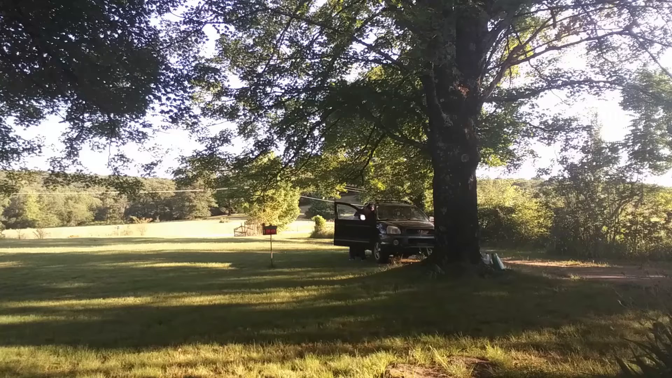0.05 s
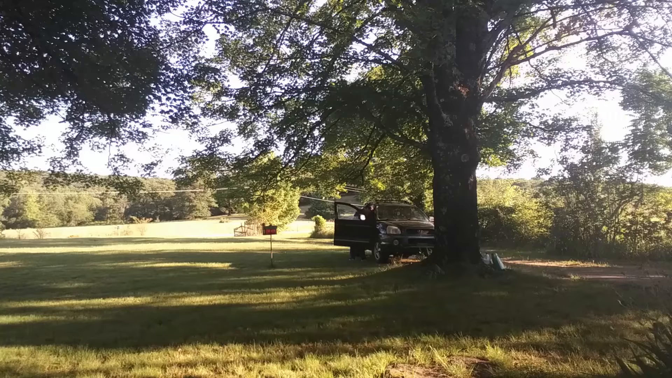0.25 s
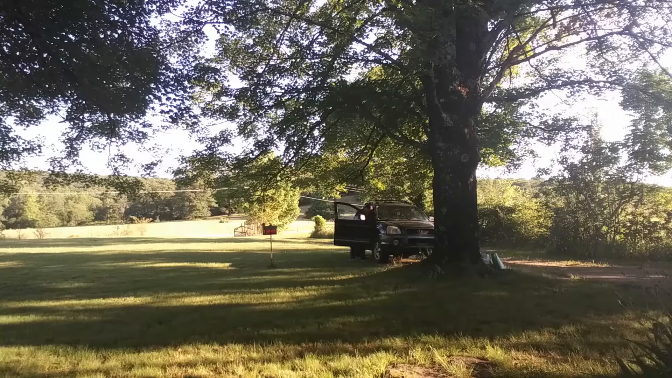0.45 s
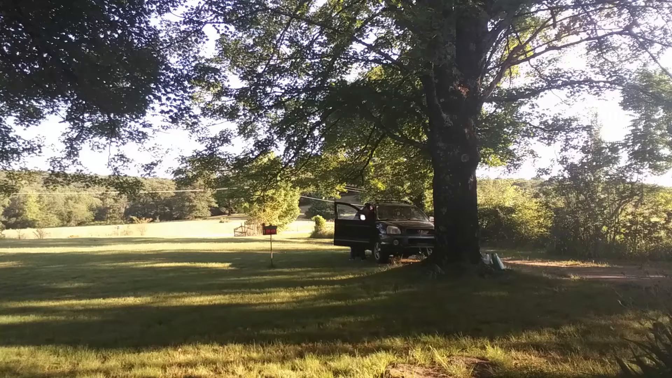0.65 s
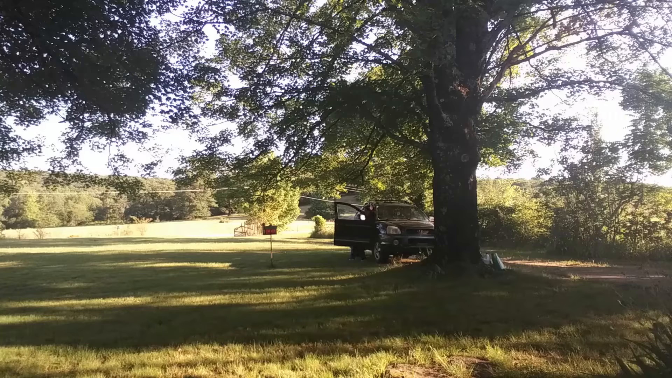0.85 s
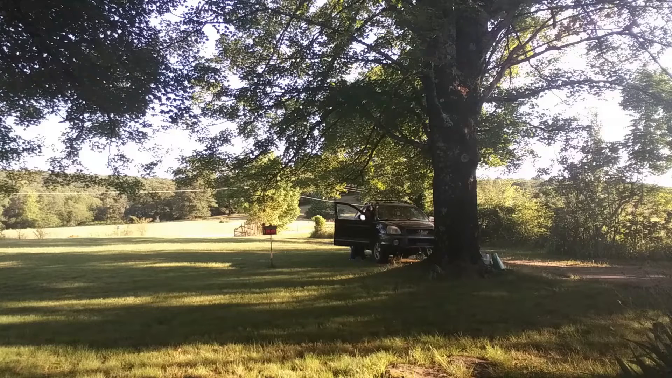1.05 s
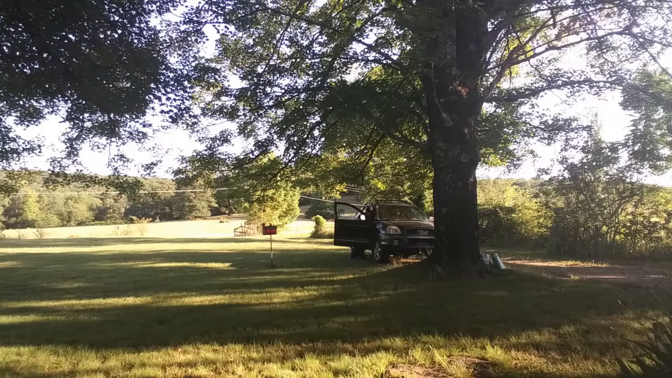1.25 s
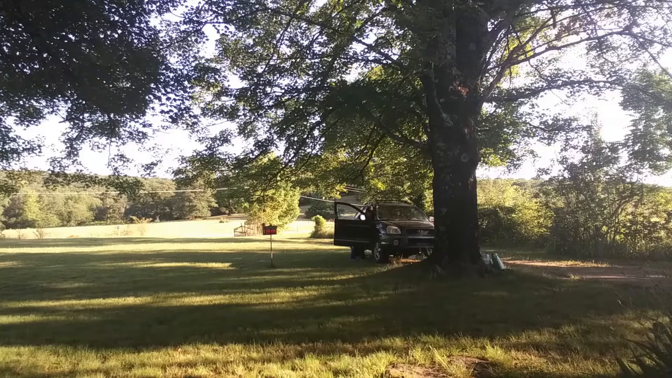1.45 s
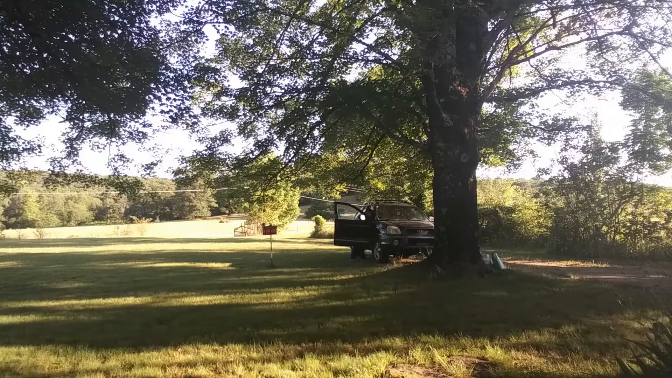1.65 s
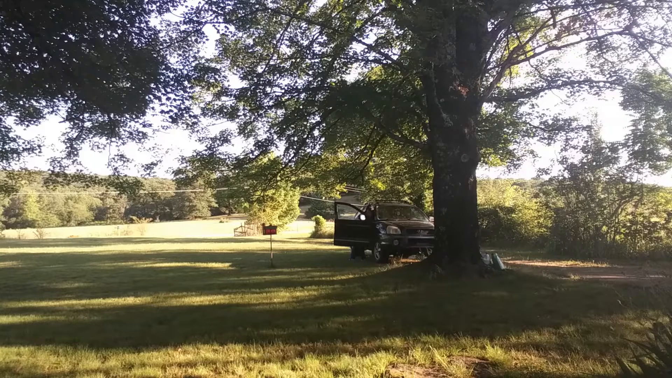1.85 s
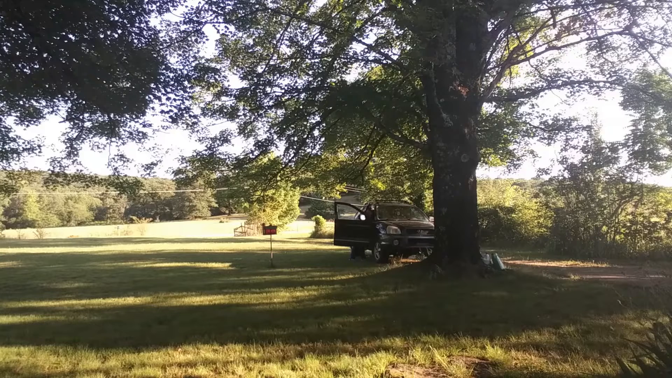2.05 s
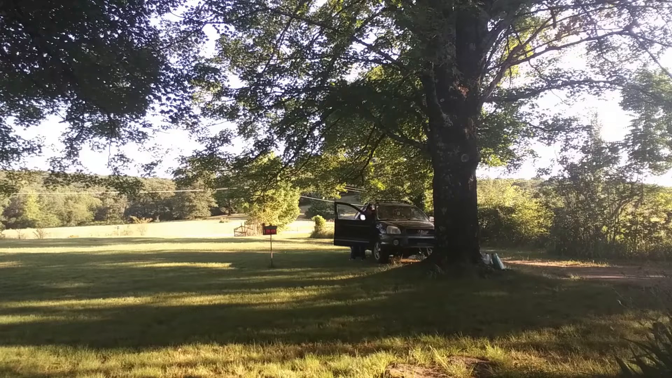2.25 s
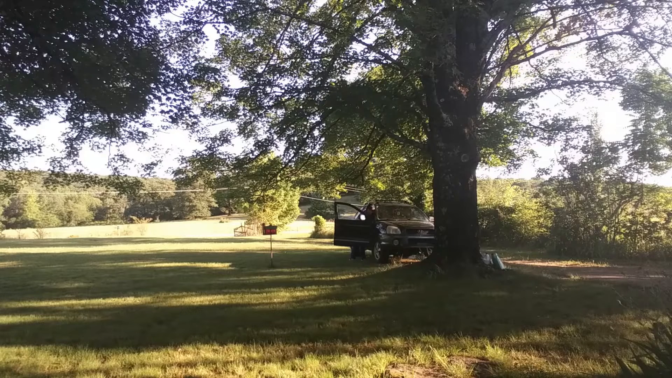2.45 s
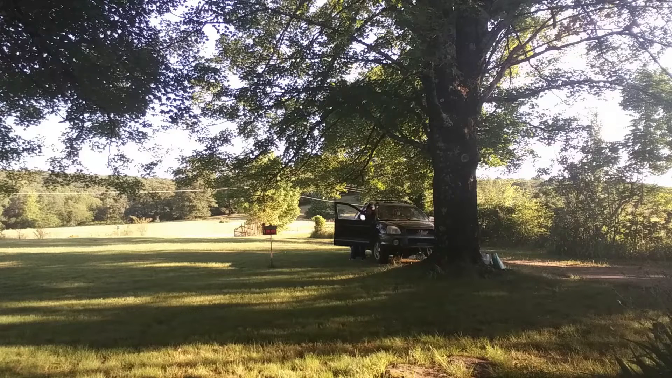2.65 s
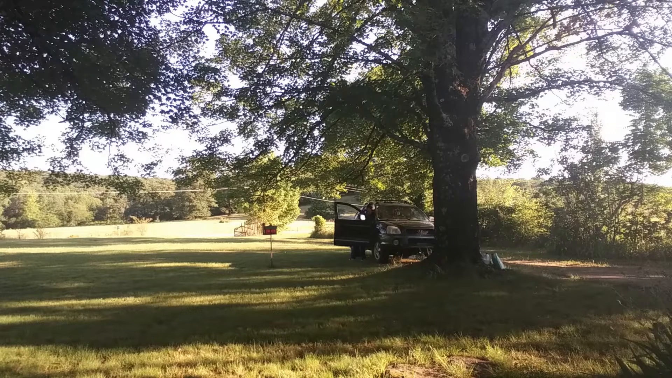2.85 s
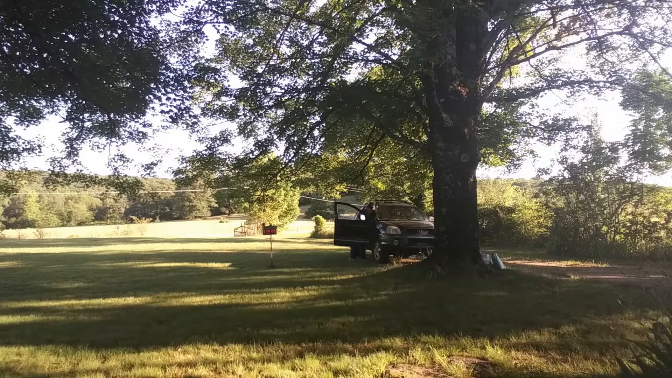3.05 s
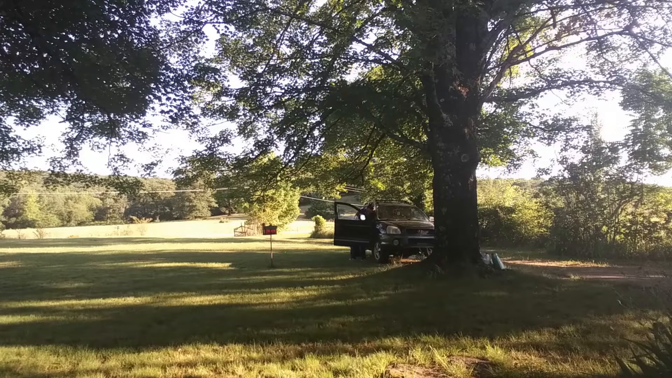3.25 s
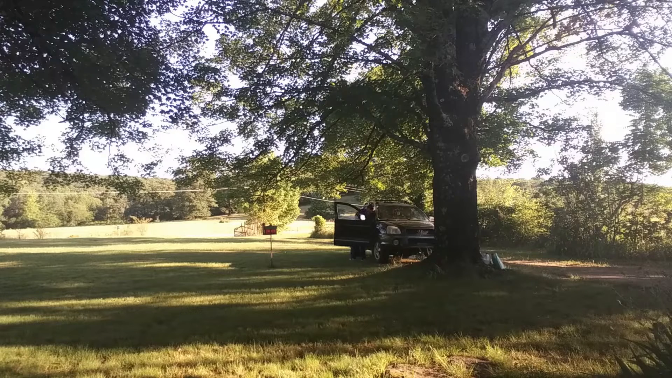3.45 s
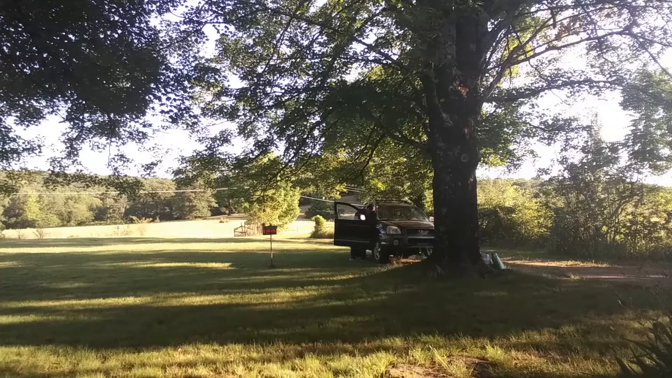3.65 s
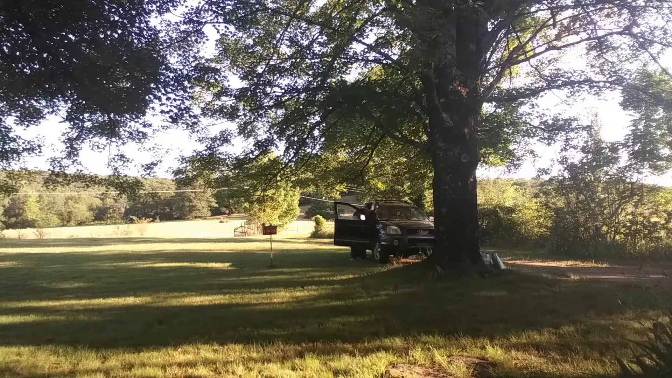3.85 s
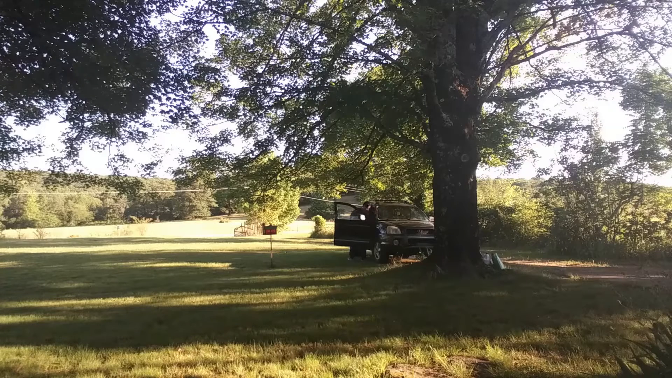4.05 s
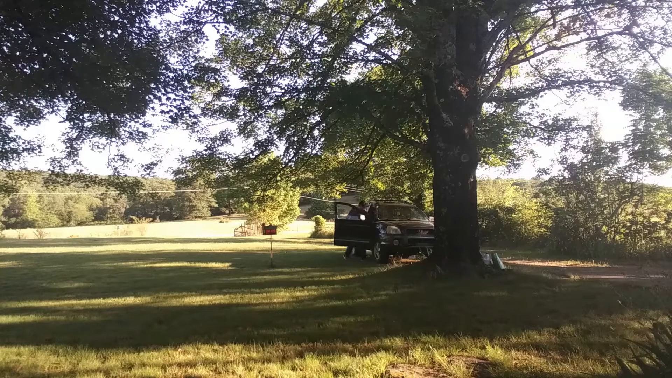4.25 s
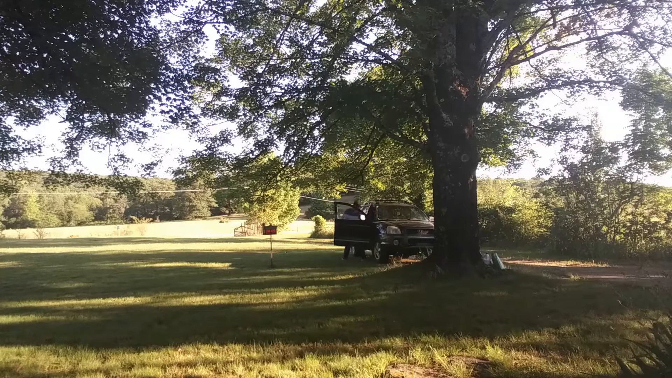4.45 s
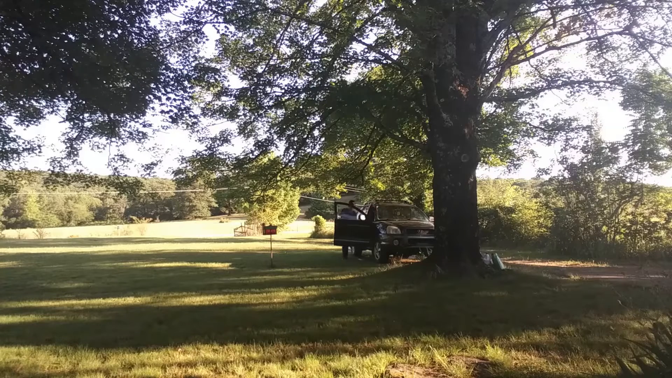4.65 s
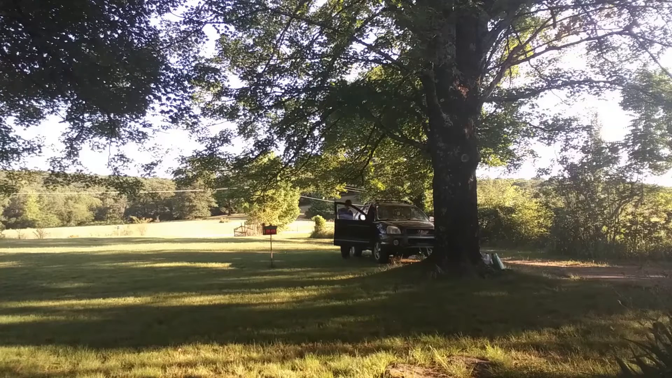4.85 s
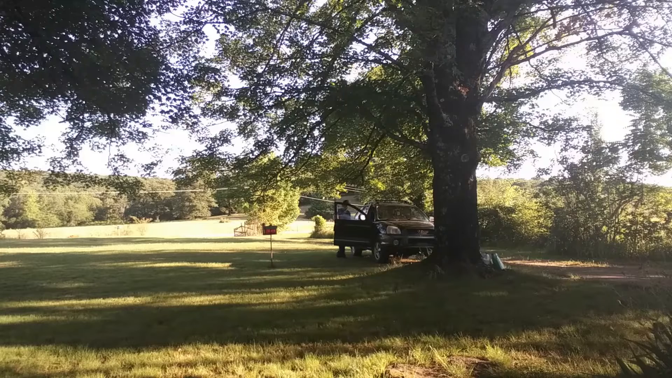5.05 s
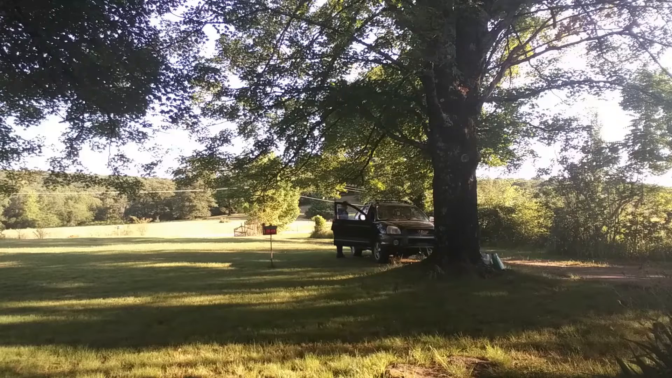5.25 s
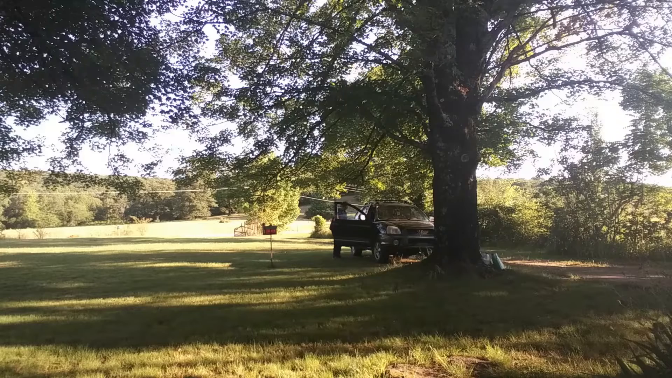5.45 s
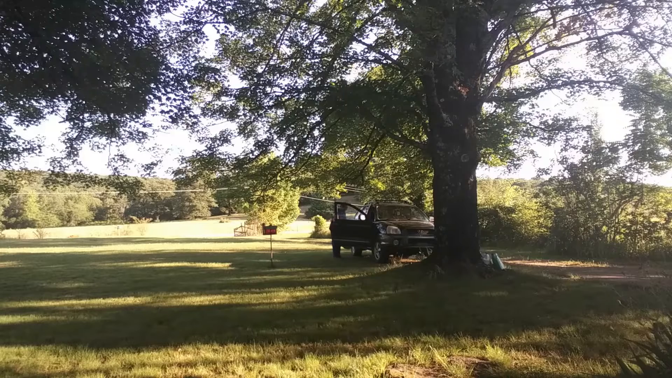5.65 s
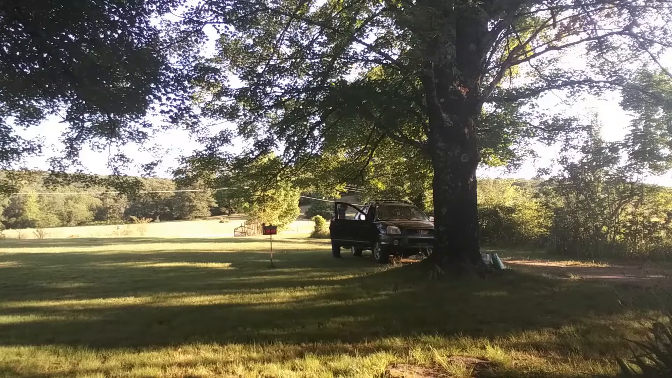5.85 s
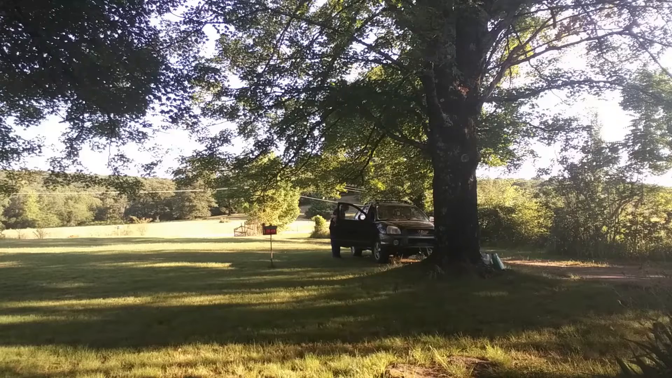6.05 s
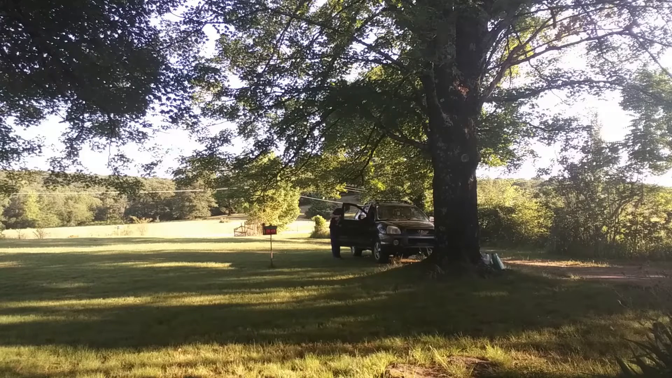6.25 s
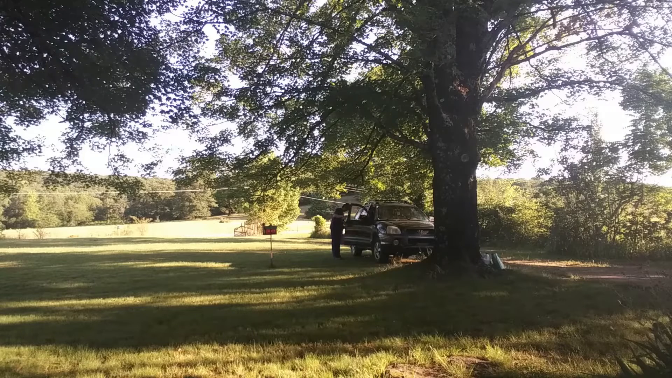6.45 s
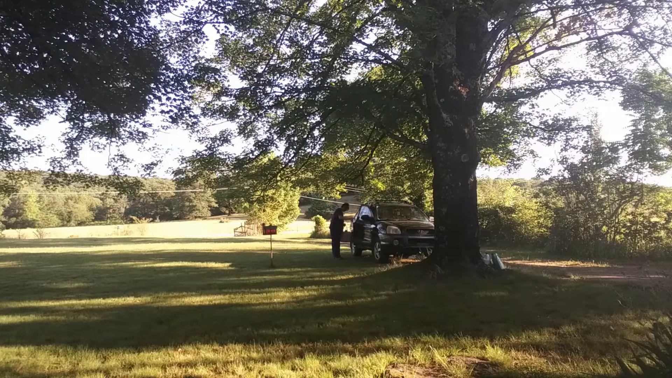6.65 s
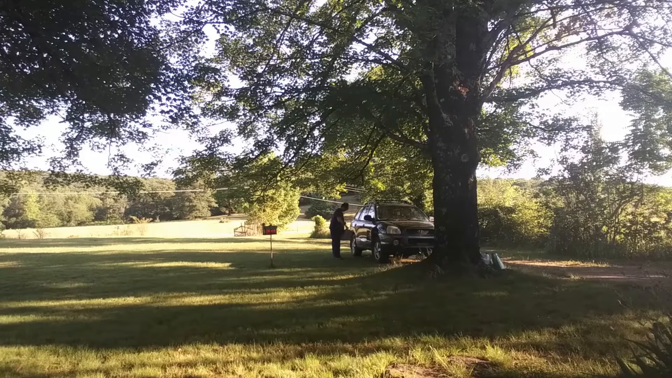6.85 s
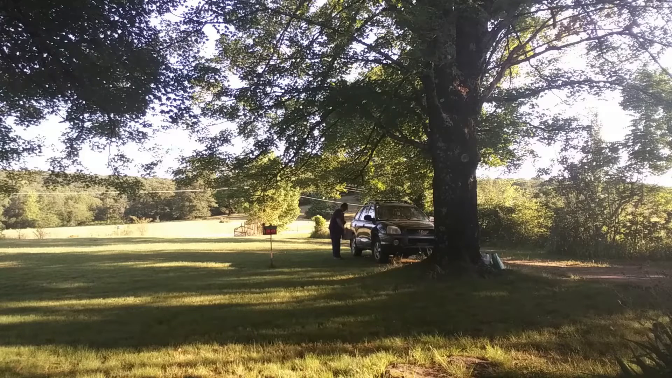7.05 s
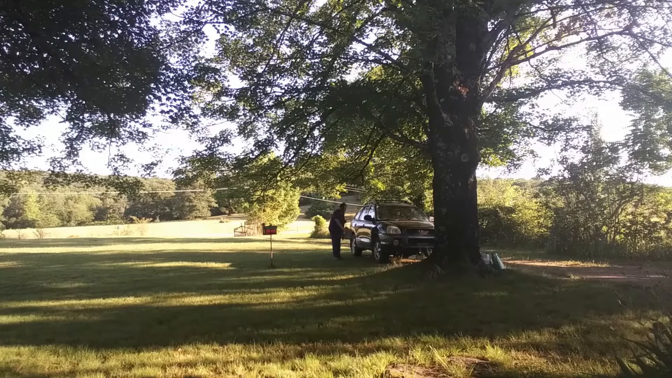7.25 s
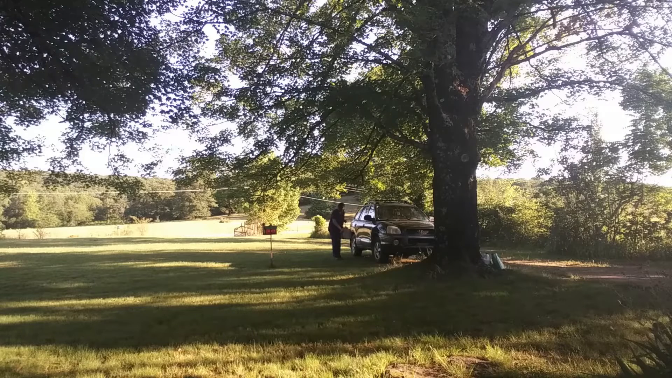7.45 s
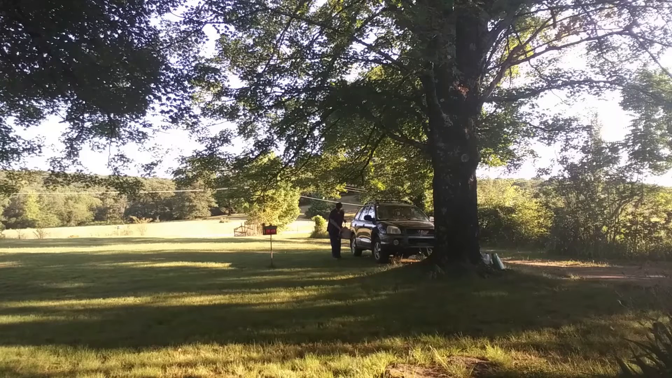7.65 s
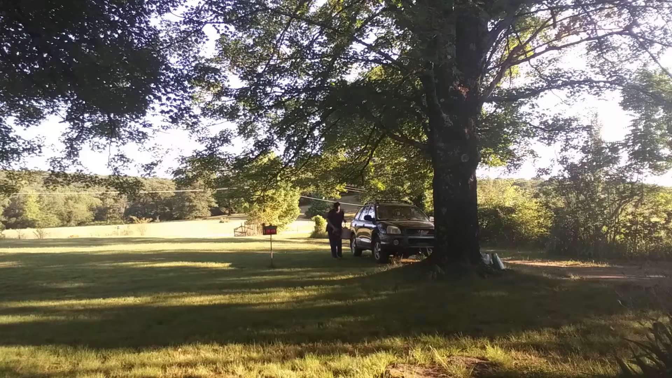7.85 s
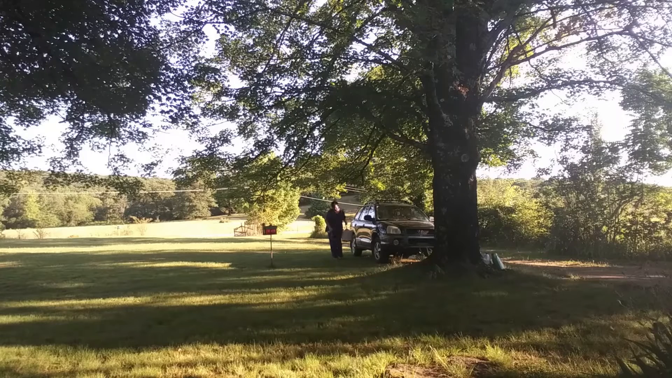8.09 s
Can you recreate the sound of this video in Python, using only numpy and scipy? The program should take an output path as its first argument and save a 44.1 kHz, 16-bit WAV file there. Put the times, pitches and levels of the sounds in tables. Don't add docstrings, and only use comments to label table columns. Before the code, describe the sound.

Outdoors in a calm yard, birds whistle and chirp in falling notes over thin insect shimmer and a low distant motor wash. The car, some way off, makes tiny clicks and dull thuds, then a brief stuttering shift. One sudden door slam dominates everything: latch, seal and frame strike nearly together, the body booms and trim rattles. Its short tree echo fades, leaving light knocks and birds in a plain mono pickup.

```python
import sys
import numpy as np
from scipy import signal
from scipy.fft import rfft, irfft, next_fast_len
from scipy.io import wavfile
from scipy.ndimage import uniform_filter1d

SR = 44100
rng = np.random.default_rng(int(sys.argv[2]) if len(sys.argv) > 2 else 0)


def bounce(signal):
    frames = np.transpose(np.atleast_2d(signal))
    limited = np.clip(frames, -1, 1)
    pcm = np.round(limited * 32767).astype(np.int16)
    wavfile.write(sys.argv[1], SR, pcm)


def field_ratio(decibels):
    return 10 ** (np.asarray(decibels, dtype=float) / 20)


N = 358091

# freq_hz, density_db_per_hz
WASH_SPECTRUM = [(12, -56), (20, -26), (38, -8), (60, -2.5), (119, 1), (179, -3), (317, -5.5), (340, -5.5),
                 (457, -7.5), (659, -9.5), (887, -8), (1530, -14), (3910, -19), (4700, -35.5), (6110, -58),
                 (10300, -120)]
WASH_DB = -66.5
# freq_hz, density_db_per_hz
HISS_SPECTRUM = [(300, -125), (3000, -119), (7000, -117), (10000, -117), (15700, -115)]
HISS_TOP_HZ = 15720
# centre_hz, width_hz, level_db
CRICKETS = [
    (5760, 104, -82),
    (5940, 530, -80.5),
    (5550, 320, -85),
]
# start_s, end_s, centre_hz, width_hz, level_db
DRONES = [
    (-1, 9, 129, 12, -83),
    (2.5, 4.1, 205, 4.2, -82),
    (2.5, 5.57, 880, 36, -83),
    (5, 5.6, 207, 15, -78),
    (12, 7.65, 550, 190, -73),
]
# start_s, end_s, pitch_hz, level_db
HUM = (5.95, 7.05, 312, -77)
# centre_hz, width_hz, level_db, chirps_per_s, wing_strokes_per_s
KATYDID = (9200, 220, -84, 5.7, 107)
# end_s, length_s, level_db
WHISTLES = [
    (0.118, .3, -81),
    (0.531, .13, -75),
    (0.96, 0.142, -78),
    (1.32, .14, -73.5),
]
WHISTLE_HZ, ONSET_SHARP_HZ, ONSET_S = 2165, 35, .04
SWELL_DB, STOP_S, ECHO_DB, ECHO_DB_PER_S = -8, .03, -11, -14
# start_s, top_hz, bottom_hz, level_db
CHIPS = [(.152, 5000, 2650, -65.5), (.268, 4430, 2450, -70), (.405, 3430, 2350, -73),
         (.788, 3210, 2950, -77), (1.644, 3800, 3170, -75), (1.83, 3100, 2670, -75),
         (1.963, 4020, 3130, -79), (2.25, 4500, 3150, -77), (2.37, 4600, 3700, -80),
         (2.495, 4850, 3800, -80), (3.038, 4500, 2750, -72.5), (3.3, 4900, 2740, -77),
         (3.075, 4900, 2930, -80), (4.195, 4700, 2460, -72), (4.318, 3980, 3060, -76),
         (5.174, 3850, 3050, -72), (5.333, 4450, 2680, -76), (5.468, 4300, 2530, -71.5),
         (6.288, 4230, 3530, -71), (6.378, 4060, 3350, -77), (6.555, 4280, 2600, -72),
         (7.494, 3330, 2900, -72), (7.631, 4850, 2290, -71.5), (7.748, 4300, 3100, -78),
         (7.882, 3430, 2480, -76.5)]
CHIP_MIN_S, CHIP_HZ_PER_S, CHIP_BEND = .022, 90000, 1.25
# start_s, length_s, pitch_hz, level_db
PEEPS = [(.5, .05, 2630, -72), (.974, 0.027, 3060, -81), (1.104, 0.042, 3130, -83), (1.31, .05, 2580, -76),
         (2.56, .05, 3750, -84), (2.58, .057, 2960, -74), (2.6, .037, 2110, -74), (2.892, 0.051, 1780, -73),
         (6.262, .057, 4270, -72), (6.57, .111, 4285, -82.5), (6.69, .101, 4250, -81),
         (6.4, .04, 4380, -82)]
# start_s, start_hz, level_db
RISES = [
    (3.045, 4150, -81),
    (3.272, 4080, -76),
    (6.218, 3270, -72.5),
    (6.35, 3450, -73.5),
]
RISE_S, RISE_SPAN_HZ, RISE_BEND = .046, 920, .6
# start_s, level_db
SLURS = [
    (3.489, -74),
    (3.735, -75),
]
SLUR_S, SLUR_HZ, SLUR_END_HZ, SLUR_BEND = .108, 4050, 3200, 2.4
# start_s, thud_db, click_db, click_hz
KNOCKS = [(1.385, -62, -53.5, 2030), (4.812, -58, -70, 1210), (4.918, -53, -57, 1260),
          (4.953, -59, -62, 1200), (5.068, -57, -57, 1520), (5.35, -52, -71, 1500), (5.4, -59, -62, 1500),
          (5.5, -70, -60, 1460), (7.389, -61, -54, 1950), (7.469, -58, -67, 1510), (7.496, -60, -57, 1725),
          (7.513, -64, -59, 1920), (7.658, -76, -58.5, 1540), (7.703, -67, -57, 1500),
          (7.7162, -52, -49, 1480), (7.728, -65, -52, 1530), (7.7393, -52, -45.5, 1580),
          (7.76, -57, -57, 1550), (7.791, -60, -61, 1500)]
KNOCK_THUD_HZ = 314
# start_s, thud_db, click_db
JUDDER = [
    (5.668, -58, -78),
    (5.778, -58, -53),
    (5.787, -59, -53.5),
    (5.797, -64, -55.5),
    (5.808, -53.5, -59),
]
JUDDER_THUD_HZ, JUDDER_CLICK_HZ = 400, 1620
# start_s, rattle_db, crack_db
STRIKES = [(6.9744, -36, -54), (6.9875, -26.5, -30.5), (6.996, -30, -46), (7.004, -33.5, -43),
           (7.015, -35, -40), (7.024, -34, -52), (7.037, -35.5, -50), (7.054, -43, -52), (7.067, -40, -56),
           (7.089, -46.5, -60), (7.106, -48, -63), (7.135, -54.5, -70), (7.176, -69, -79)]
# start_s, pitch_hz, level_db
THUMPS = [(6.975, 445, -29.5), (6.9904, 144, -18), (6.9895, 436, -15.5), (6.996, 298, -17),
          (6.991, 550, -27), (7.001, 118, -25), (7.0134, 408, -12.5), (7.019, 116, -19),
          (7.019, 297, -11.5), (7.032, 167, -28), (7.045, 322, -25), (7.0568, 134, -26), (7.0677, 400, -23),
          (7.069, 296, -25.5), (7.079, 112, -30), (7.087, 247, -37), (7.106, 368, -33.5),
          (7.117, 98, -36.5), (7.145, 392, -45), (7.205, 125, -55)]
THUMP_CYCLES = 13.1
# start_s, pitch_hz, level_db
LATCH = [
    (6.987, 1000, -25.5),
    (6.988, 4420, -26),
    (6.995, 2400, -25),
    (7.003, 1790, -33),
]
LATCH_T60_S = 0.022
# start_s, pitch_hz, level_db, t60_s
CABIN = [
    (7.0, 60.5, -28.5, 0.39),
    (7.151, 70, -41, .08),
    (7.028, 213.5, -25.5, 0.26),
    (7.014, 525, -36, 0.27),
    (7.069, 1265, -40, .13),
]
# pitch_hz, level_db
GLASS = [
    (1620, -58),
    (2050, -64),
    (3540, -64),
]
GLASS_START_S, GLASS_T60_S = 7.166, .22
# pitch_hz, level_db, t60_s
PANELS = [(660, 15, 0.069), (974, -5, 0.21), (1037, -2, 0.25), (1212, 10.5, 0.37), (1290, -26, 5.1),
          (1480, 0, 0.23), (1480, 1, 0.18), (1590, 8, 0.3), (1760, 8, 0.31), (1980, -23, 0.25),
          (2035, -23, 2.0), (2130, 2, 0.37), (2510, 3, 0.19), (2500, -15, 0.15), (2280, -1, 0.5),
          (2610, 5, 0.18), (2670, -3, 0.46), (2960, 5.5, 0.24), (3130, -15, 0.58), (3596, -1, 0.67),
          (3450, -1, 0.37), (4120, -5, 0.2), (4250, -17, 0.61), (4020, 2, 0.2)]
# freq_hz, density_db_per_hz
RATTLE_SPECTRUM = [(350, -50), (600, -8), (736, 2), (1030, -5.5), (1240, -5), (1370, -1), (2100, -3.5),
                   (2270, -7), (3540, -9.5), (5000, -52), (6500, -50), (11000, -120)]
# freq_hz, density_db_per_hz
CRACK_SPECTRUM = [(2060, -19), (3500, 3.5), (4840, -2.5), (5030, -8), (6660, -1.5), (7460, -10),
                  (9110, -16.5), (12500, -30), (15600, -38)]
# freq_hz, t60_s
TREES = [(100, 0.3), (250, 0.5), (450, 0.75), (1500, 1), (3500, 0.83), (8000, 1)]
GRASS_DIP_HZ = 630
# centre_s, loss_db, above_hz
DROPOUTS = [(.0743, -15, 2300), (.2234, -13, 1600), (1.097, -11, 1500), (1.548, -10, 1600),
            (1.82, -13, 1900), (1.8875, -6, 1500), (4.0417, -13, 2100), (5.066, -12, 1200),
            (5.32, -12, 1100), (5.443, -3, 3000), (5.8765, -11, 2300), (7.1994, -12, 2200)]


def evened(x):
    return x / np.sqrt(np.mean(x ** 2) + 1e-20)


def read(points, hz):
    f, value = np.transpose(points)
    return np.interp(np.log(hz + 1), np.log(f + 1), value)


def add(mix, start_s, sound):
    part = mix[round(start_s * SR):][:len(sound)]
    part += sound[:len(part)]


def decay(t, t60_s):
    return field_ratio(-60 * t / t60_s)


def sine(hz, t):
    return np.sin(2 * np.pi * hz * t)


def gliding_sine(hz):
    return np.sqrt(2) * np.sin(2 * np.pi * np.cumsum(hz) / SR)


def coloured(spectrum, size):
    gain = field_ratio(read(spectrum, np.fft.rfftfreq(size, 1 / SR)))
    return irfft(rfft(rng.standard_normal(size)) * gain, size) * np.sqrt(SR / 2)


def fuzzy(hz, width_hz):
    size = next_fast_len(N)
    f = np.fft.rfftfreq(size, 1 / SR)
    spectrum = rfft(rng.standard_normal(size)) / (1 + (2 * (f - hz) / width_hz) ** 2)
    return evened(irfft(spectrum, size)[:N])


def ring(hz, t60_s, t, rise_s):
    return decay(t, t60_s) * sine(hz, t) * (1 - np.exp(-t / rise_s))


def fade_gate(t, start_s, end_s, fade_s):
    return np.clip(np.minimum(t - start_s, end_s - t) / fade_s, 0, 1)


def background():
    t = np.arange(N) / SR
    wash = evened(coloured(WASH_SPECTRUM, next_fast_len(N)))
    _, _, z = signal.stft(wash, SR, nperseg=1024)
    patches = uniform_filter1d(rng.standard_normal(z.shape), 8, 0)
    patches = evened(uniform_filter1d(patches, 10, 1))
    wash = signal.istft(z * field_ratio(1.23 * patches), SR, nperseg=1024)[1][:N]
    wash = field_ratio(WASH_DB - 0.72) * wash

    flutter = field_ratio(0.51 * evened(uniform_filter1d(rng.standard_normal(N), 500)))
    chorus = sum(field_ratio(db) * fuzzy(hz, width_hz) for hz, width_hz, db in CRICKETS) * flutter

    drones = sum(field_ratio(db) * fuzzy(hz, width_hz) * fade_gate(t, start_s, end_s, 0.1)
                 for start_s, end_s, hz, width_hz, db in DRONES)
    start_s, end_s, hz, db = HUM
    hum = field_ratio(db) * np.sqrt(2) * sine(hz, t) * fade_gate(t, start_s, end_s, 0.18)
    hum = hum * field_ratio(1.5 * fuzzy(0, 8))

    hiss = coloured(HISS_SPECTRUM, next_fast_len(N))[:N]
    lowpass = signal.firwin(1023, HISS_TOP_HZ, window=("kaiser", 9), fs=SR)
    hiss = signal.oaconvolve(hiss, lowpass, "same")
    return wash + chorus + drones + hum + hiss


def katydid():
    hz, width_hz, db, chirps_per_s, strokes_per_s = KATYDID
    pace = np.cumsum(chirps_per_s * (1 + .06 * fuzzy(0, 1))) / SR
    gate = np.clip(.2 + 1.5 * np.cos(2 * np.pi * (pace - .05)), 0, 1)
    wing = .6 + .4 * np.cos(2 * np.pi * strokes_per_s * np.arange(N) / SR)
    return field_ratio(db) * fuzzy(hz, width_hz) * gate * wing


def whistler():
    t, level = np.arange(N) / SR, np.zeros(N)
    hz = np.full(N, float(WHISTLE_HZ))
    for end_s, length_s, db in WHISTLES:
        since = t - end_s + length_s
        after = np.maximum(t - end_s, 0)
        swell_db = SWELL_DB * (1 - np.clip(since / length_s, 0, 1))
        held = field_ratio(db + swell_db) * np.clip(since / STOP_S, 0, 1)
        echo = field_ratio(ECHO_DB + ECHO_DB_PER_S * after) * np.clip(4.5 - after / 0.095, 0, 1)
        level += held * np.maximum(1 - after / STOP_S, echo)
        hz += ONSET_SHARP_HZ * np.exp(-(since / ONSET_S) ** 2)
    return level * field_ratio(3 + 1.5 * fuzzy(0, 30)) * gliding_sine(hz)


def bird_notes():
    rows = [(s, CHIP_MIN_S + (top_hz - low_hz) / CHIP_HZ_PER_S, top_hz, low_hz, CHIP_BEND, db)
            for s, top_hz, low_hz, db in CHIPS]
    rows += [(s, length_s, hz, hz, 1, db) for s, length_s, hz, db in PEEPS]
    rows += [(s, RISE_S, hz, hz + RISE_SPAN_HZ, RISE_BEND, db) for s, hz, db in RISES]
    rows += [(s, SLUR_S, SLUR_HZ, SLUR_END_HZ, SLUR_BEND, db) for s, db in SLURS]
    return rows


def birds():
    out = np.zeros(N)
    for start_s, length_s, start_hz, end_hz, bend, db in bird_notes():
        u = np.arange(0, 1.12, 1 / (length_s * SR))
        waver, flicker = (evened(uniform_filter1d(v, 350)) for v in rng.standard_normal((2, len(u))))
        glide_hz = start_hz + (end_hz - start_hz) * (u ** bend + .025 * waver)
        flicker_db = 2.6 * (flicker - flicker.mean()) - 2.0
        swell = signal.windows.tukey(len(u), .45) * field_ratio(flicker_db)
        add(out, start_s, field_ratio(db) * swell * gliding_sine(glide_hz))
    leaves = rng.standard_normal(900) * decay(np.arange(900) / SR, .03)
    smeared = signal.fftconvolve(out, leaves / np.linalg.norm(leaves))[:N]
    return .85 * out + .48 * smeared


def knocks():
    out, t = np.zeros(N), np.arange(4000) / SR
    rows = [(s, thud_db, KNOCK_THUD_HZ, click_db, hz) for s, thud_db, click_db, hz in KNOCKS]
    rows += [(s, thud_db, JUDDER_THUD_HZ, click_db, JUDDER_CLICK_HZ) for s, thud_db, click_db in JUDDER]
    for start_s, thud_db, thud_hz, click_db, click_hz in rows:
        thud = 1.68 * ring(thud_hz, 0.047, t, 0.0015)
        ping = 1.24 * ring(click_hz, 0.025, t, 0.00043) + .2 * ring(2.6 * click_hz, 0.01, t, .0002)
        grit = evened(coloured(CRACK_SPECTRUM, len(t))) * decay(t, .04)
        click = .8 * ping + .06 * grit
        scuff = .3 * evened(coloured(RATTLE_SPECTRUM, len(t))) * decay(t, .05)
        add(out, start_s, field_ratio(thud_db) * thud + field_ratio(click_db) * (click + scuff))
    return out


def door_modes():
    out, t = np.zeros(N), np.arange(SR // 2) / SR
    rows = [(s, hz, db, THUMP_CYCLES / hz) for s, hz, db in THUMPS]
    rows += [(s, hz, db, LATCH_T60_S) for s, hz, db in LATCH]
    rows += list(CABIN)
    rows += [(GLASS_START_S, hz, db, GLASS_T60_S) for hz, db in GLASS]
    for start_s, hz, db, t60_s in rows:
        add(out, start_s, -field_ratio(db) * ring(hz, t60_s, t, 0.00063))
    return out


def door_strikes():
    out, t = np.zeros(N), np.arange(SR // 2) / SR
    skin = sum(field_ratio(db) * ring(hz, 0.39 * min(t60_s, .35), t, 0.00037) for hz, db, t60_s in PANELS)
    t = t[:SR // 4]
    for start_s, rattle_db, crack_db in STRIKES:
        chatter = rng.standard_normal(len(t)) * decay(t, 0.094)
        shaken = signal.fftconvolve(chatter, skin)[:len(t)]
        shaken = shaken / np.sqrt(np.mean(shaken[:600] ** 2))
        loose = evened(coloured(RATTLE_SPECTRUM, len(t))) * decay(t, .11) * (1 - np.exp(-t / 0.0013))
        grains = evened(uniform_filter1d(rng.standard_normal(len(t)), 90))
        loose = loose * field_ratio(2.5 * grains)
        crack = evened(coloured(CRACK_SPECTRUM, len(t))) * decay(t, 0.093) * (1 - np.exp(-t / 0.0016))
        rattle = .28 * shaken + .9 * loose
        add(out, start_s, field_ratio(rattle_db) * rattle + field_ratio(crack_db) * crack)
    return out


def trees(x):
    taps = np.zeros(SR)
    at = np.arange(900, SR - 20, 20)
    taps[at + rng.integers(0, 20, len(at))] = rng.choice([-1., 1.], len(at))
    hz, t, z = signal.stft(taps, SR, nperseg=256)
    tail = signal.istft(z * decay(t, read(TREES, hz)[:, None]), SR, nperseg=256)[1]
    return signal.fftconvolve(x, tail / np.linalg.norm(tail))[:N]


def scene():
    direct = knocks() + door_modes() + door_strikes()
    car = .25 * direct + 0.68 * signal.lfilter(*signal.iirnotch(GRASS_DIP_HZ, 6., SR), direct)
    air = signal.butter(10, 15900, fs=SR, output="sos")
    car = signal.sosfilt(air, car)
    song = birds()
    scattered = trees(field_ratio(-22.5) * car) + trees(field_ratio(-5.5) * song)
    return (background() + katydid() + whistler() + song + car + scattered)[None]


def band_limit(x):
    return signal.sosfilt(signal.butter(12, 16230, fs=SR, output="sos"), x)


def record(dry):
    bass_cut = signal.butter(3, 48, "highpass", fs=SR, output="sos")
    x = signal.sosfilt(bass_cut, dry[0])
    hz, t, z = signal.stft(x, SR, nperseg=256, noverlap=192)
    affected = 1 - .8 * np.exp(-((hz - 5800) / 350) ** 2)
    loss_db = sum(db * np.outer((hz > above_hz) * affected, np.exp(-((t - centre_s) / .009) ** 4))
                  for centre_s, db, above_hz in DROPOUTS)
    x = signal.istft(z * field_ratio(loss_db), SR, nperseg=256, noverlap=192)[1][:N]
    return band_limit(x[None])


dry = scene()
out = record(dry)
bounce(out)
```